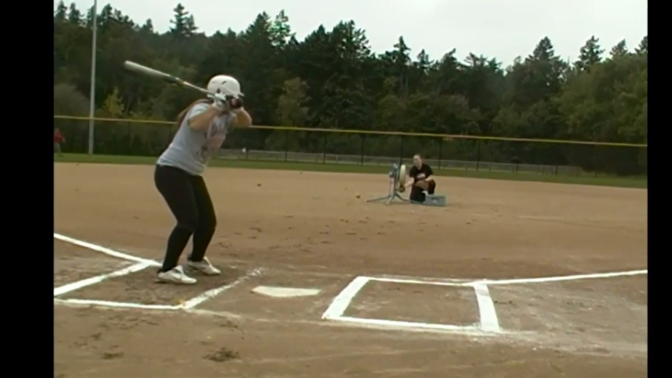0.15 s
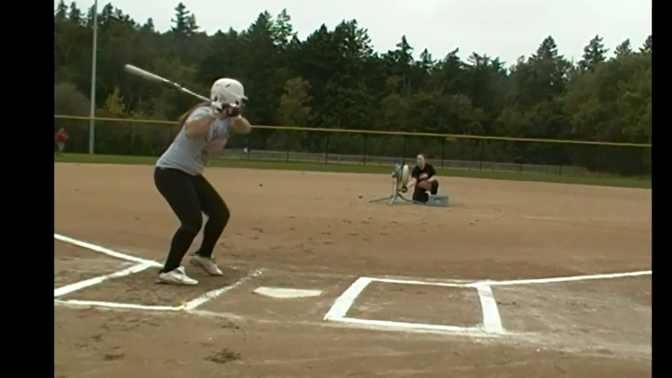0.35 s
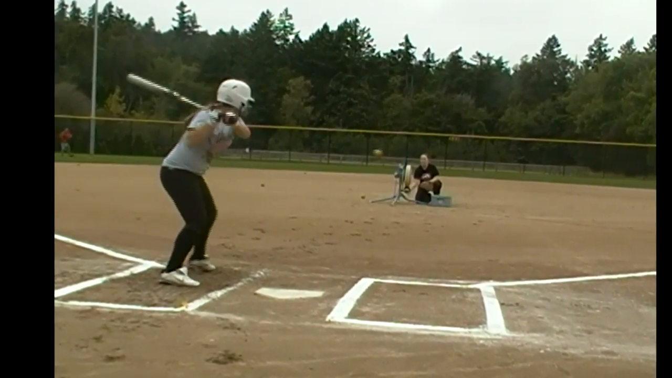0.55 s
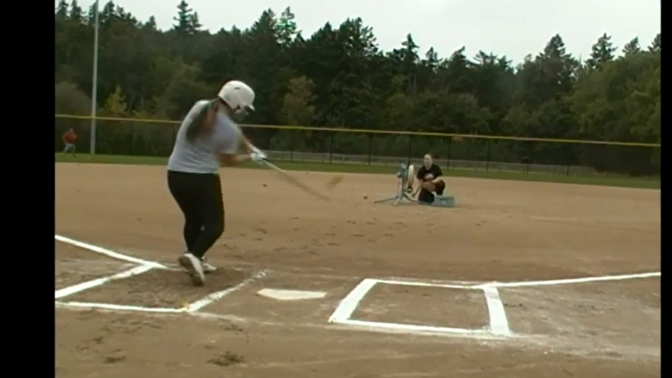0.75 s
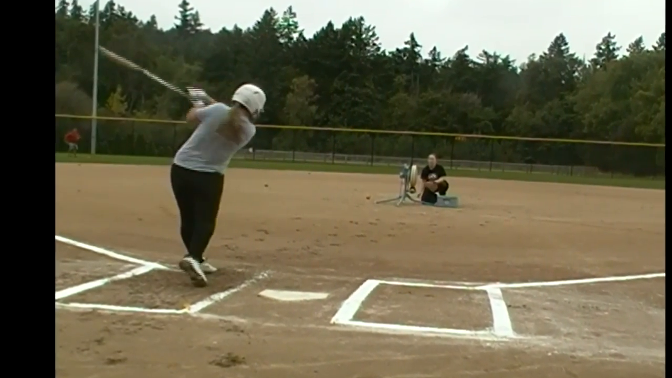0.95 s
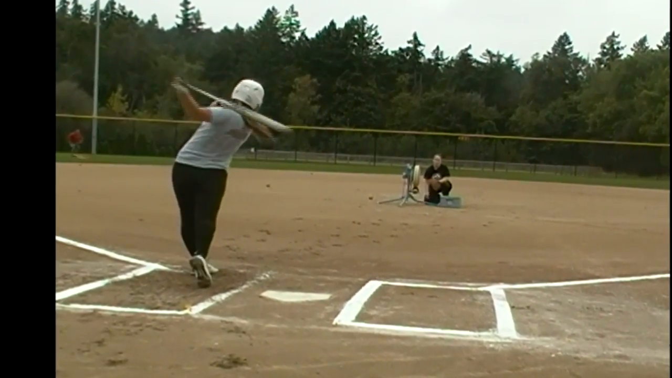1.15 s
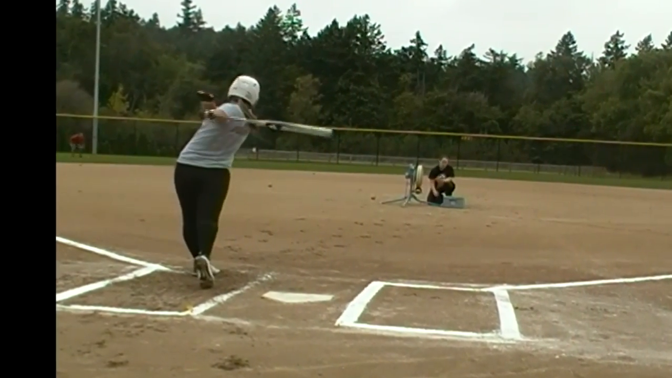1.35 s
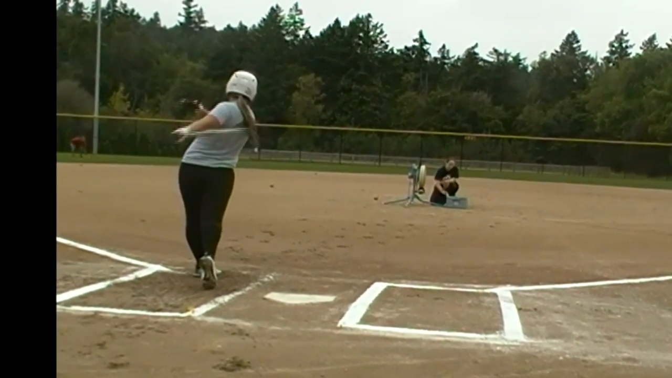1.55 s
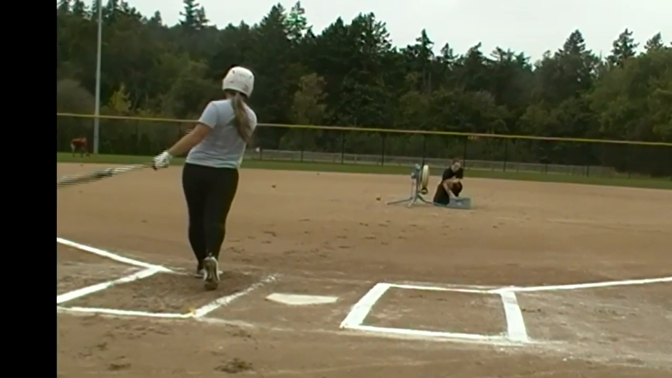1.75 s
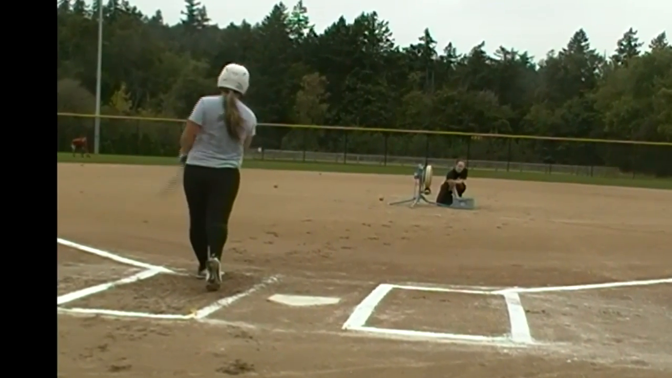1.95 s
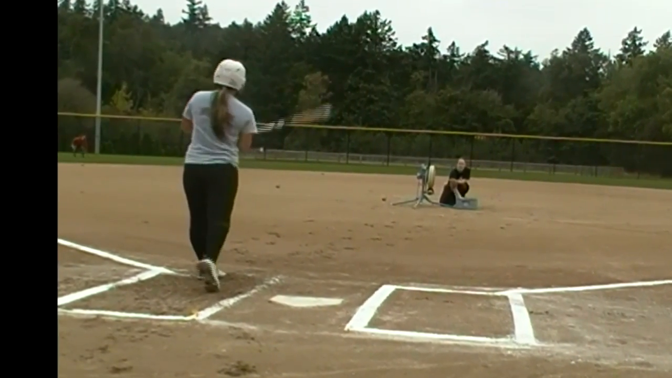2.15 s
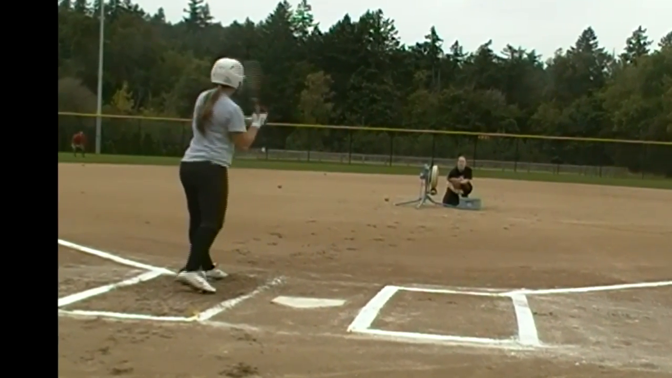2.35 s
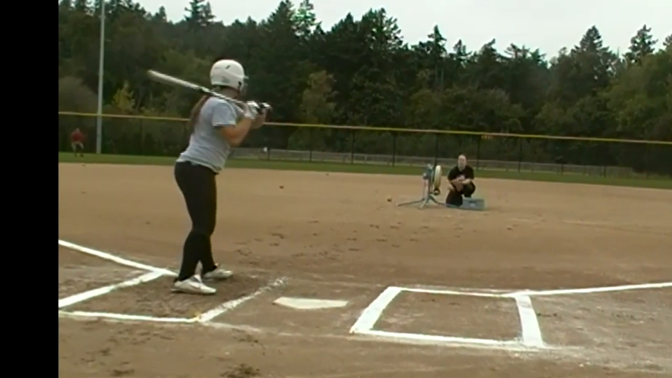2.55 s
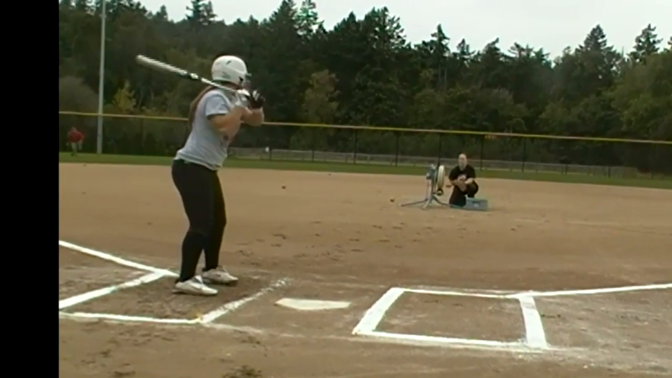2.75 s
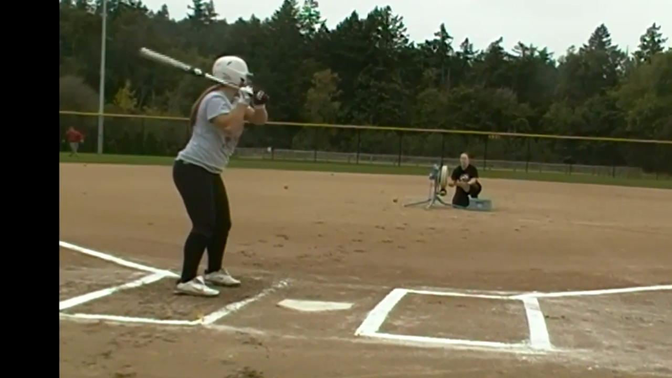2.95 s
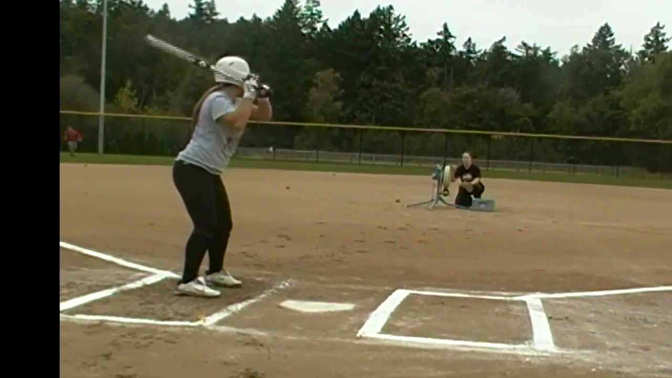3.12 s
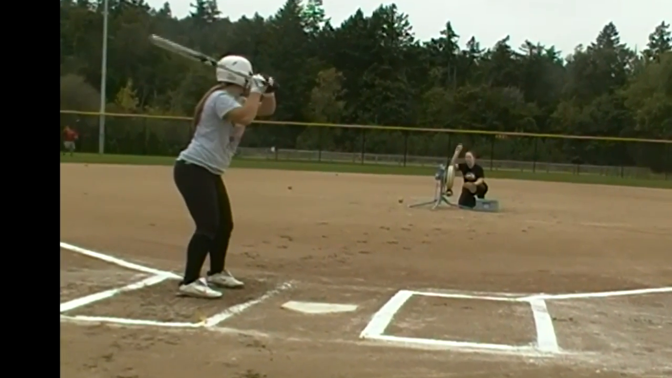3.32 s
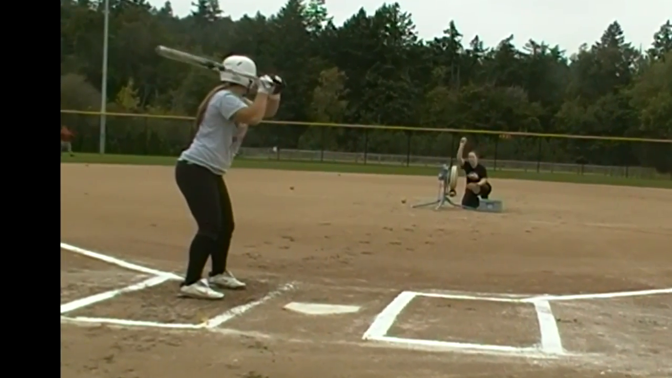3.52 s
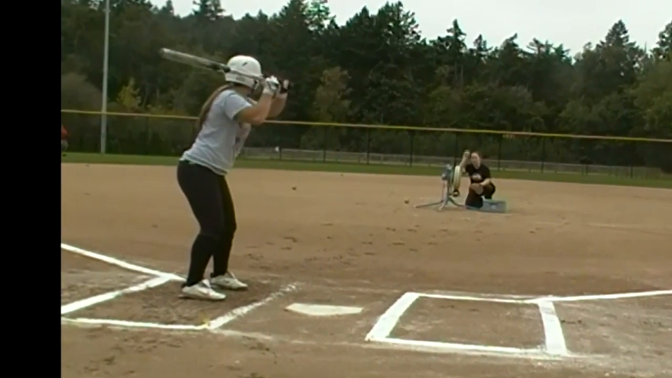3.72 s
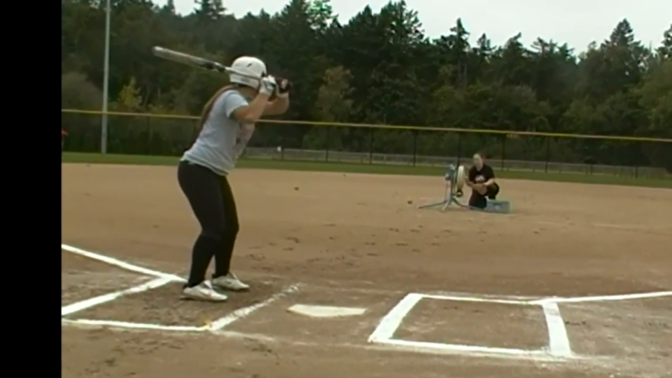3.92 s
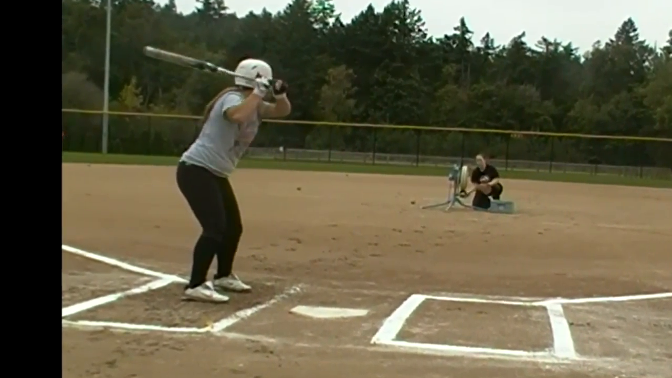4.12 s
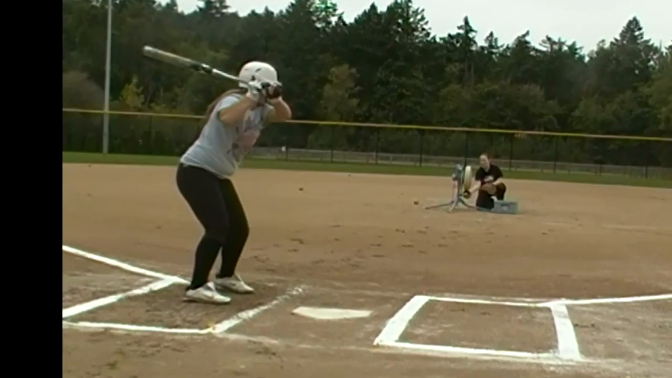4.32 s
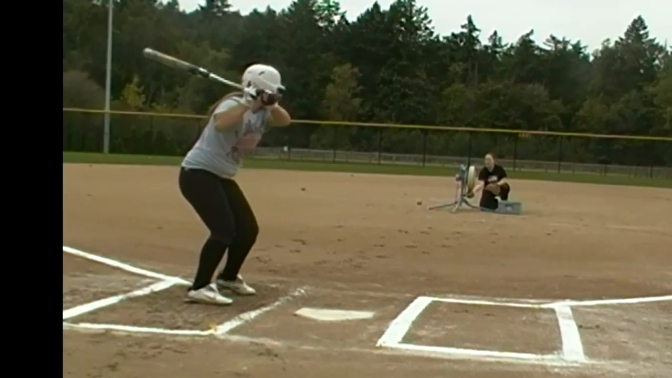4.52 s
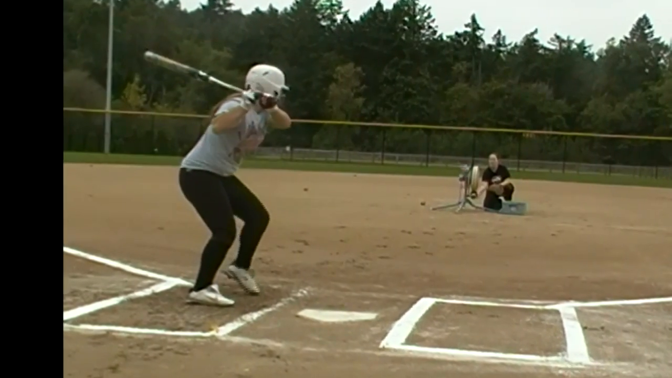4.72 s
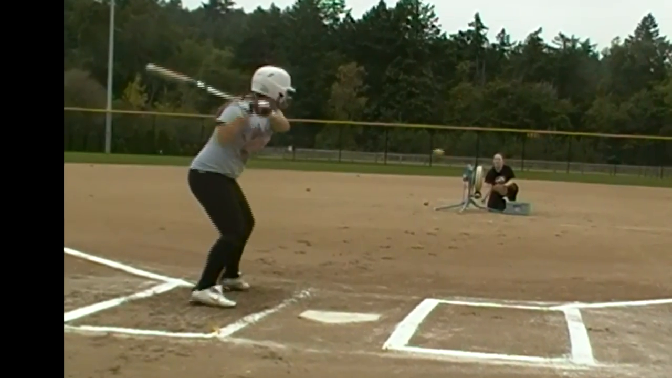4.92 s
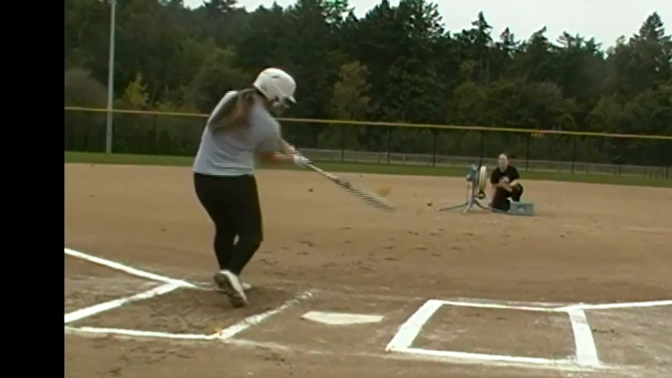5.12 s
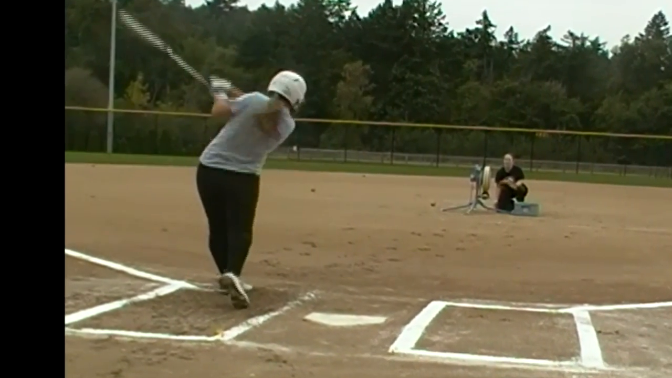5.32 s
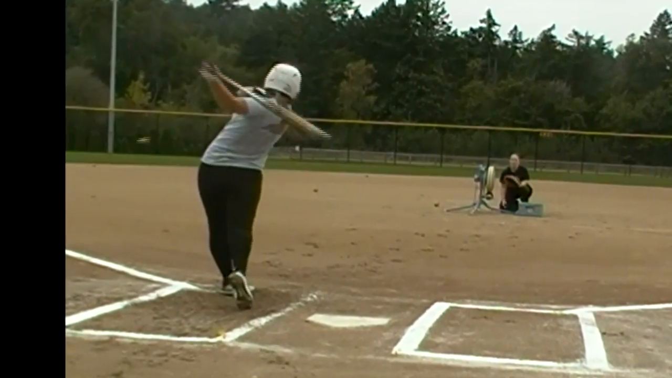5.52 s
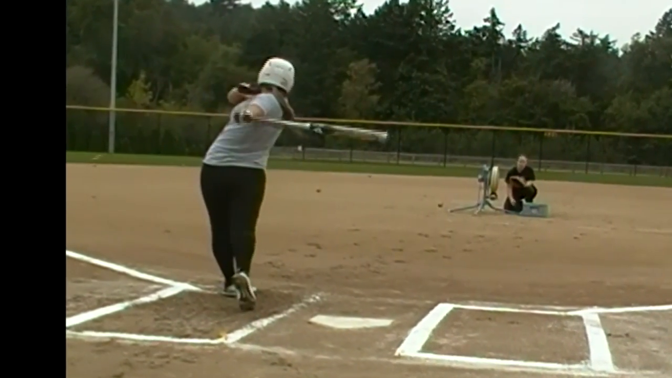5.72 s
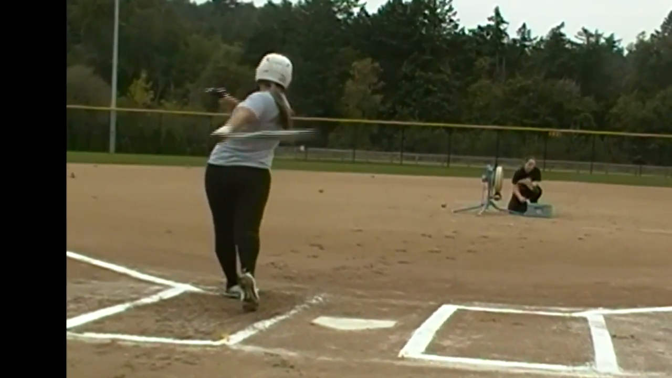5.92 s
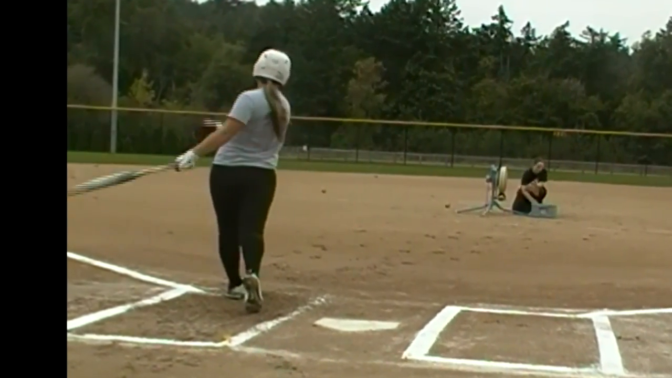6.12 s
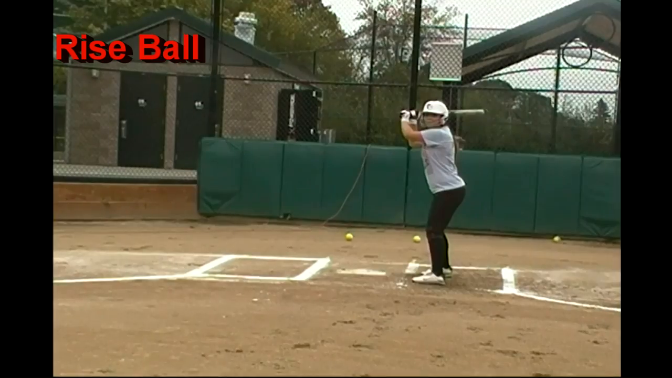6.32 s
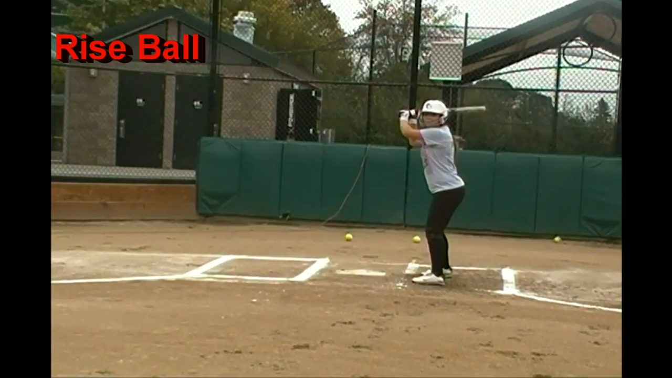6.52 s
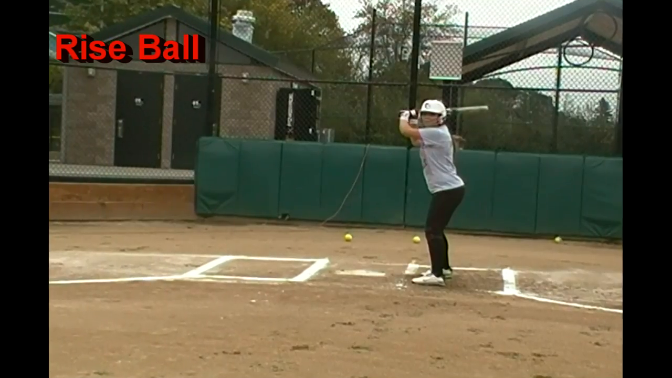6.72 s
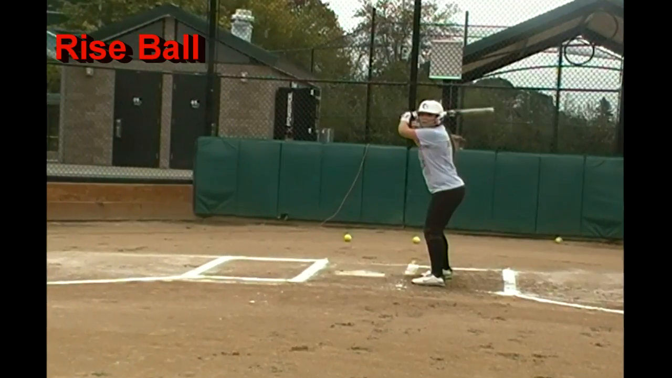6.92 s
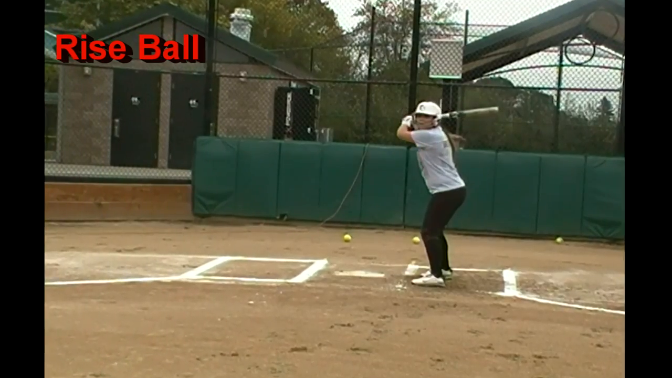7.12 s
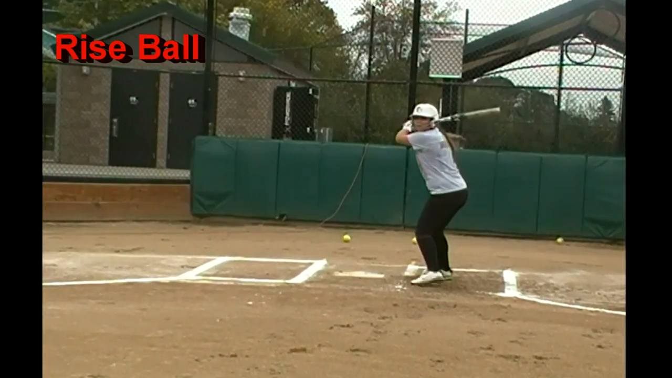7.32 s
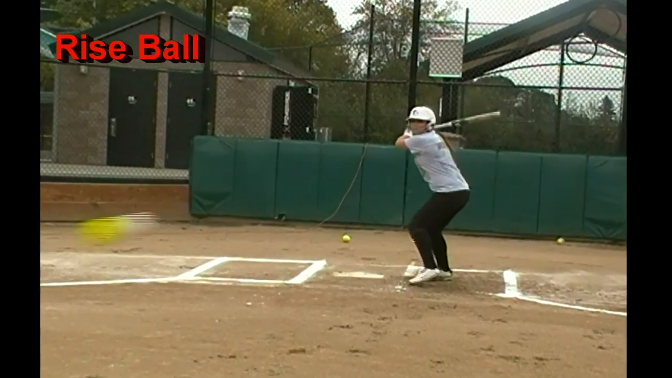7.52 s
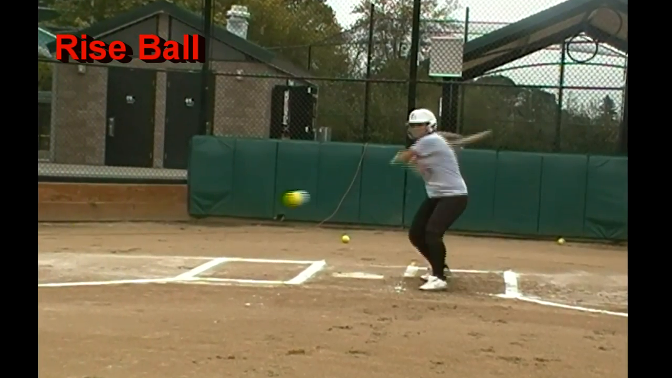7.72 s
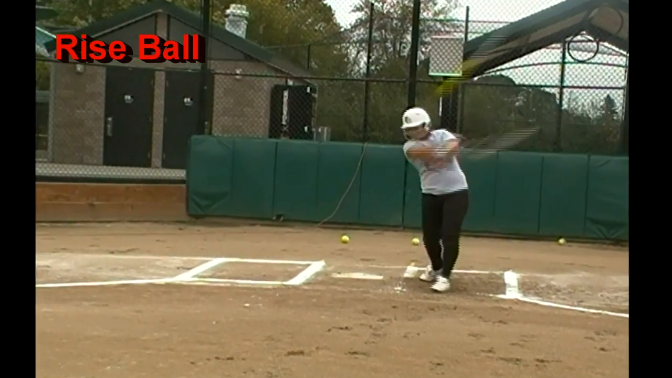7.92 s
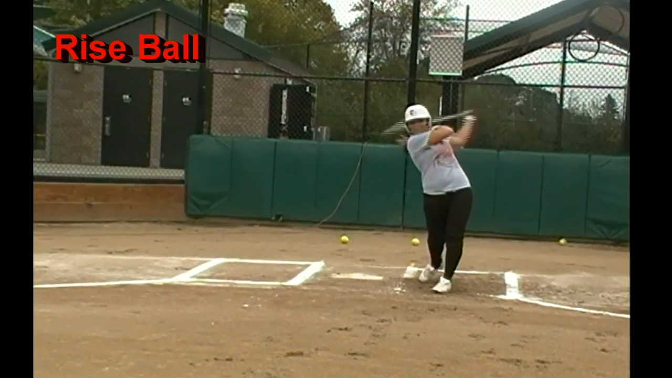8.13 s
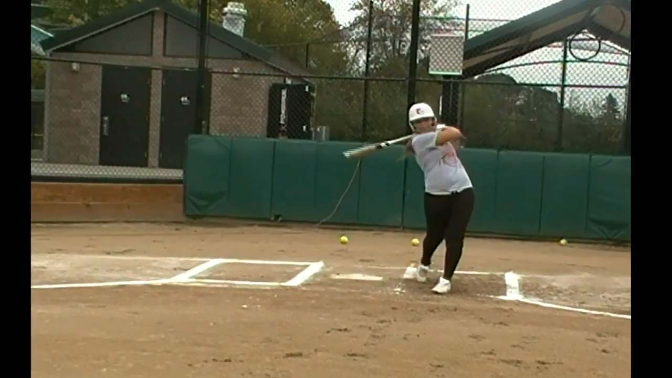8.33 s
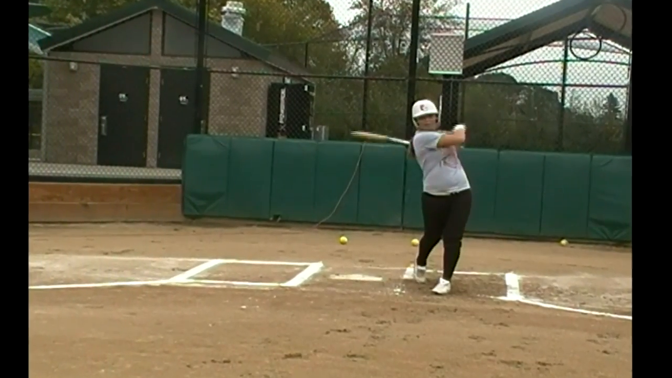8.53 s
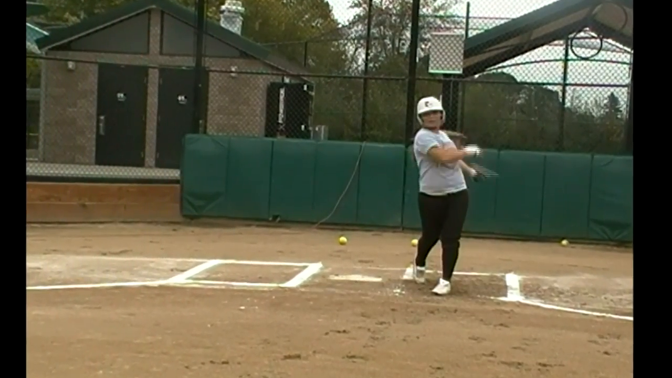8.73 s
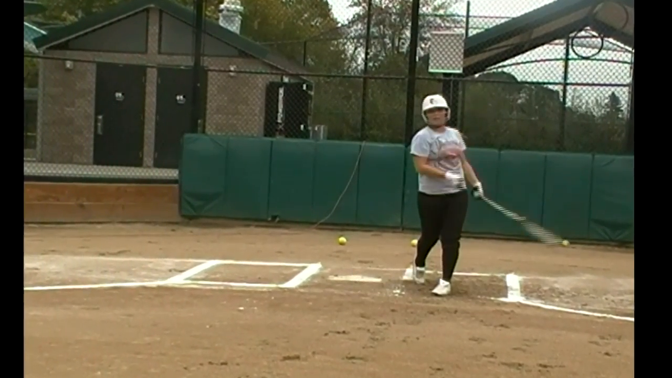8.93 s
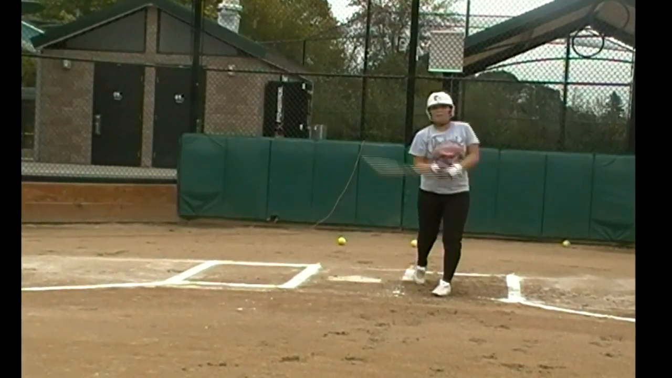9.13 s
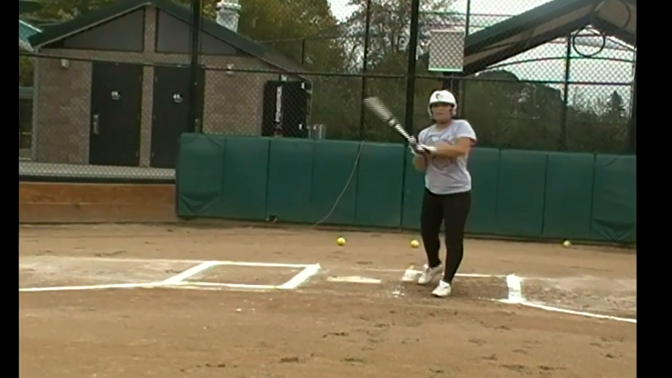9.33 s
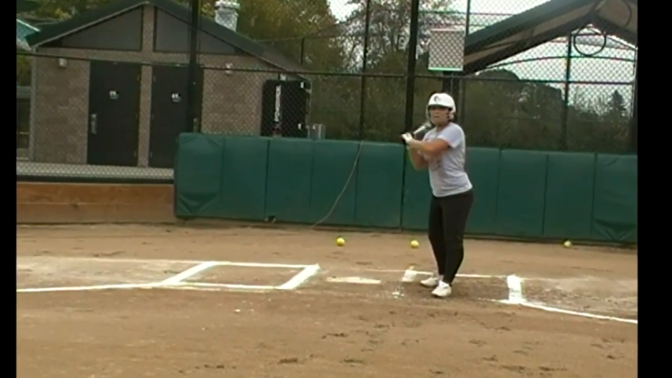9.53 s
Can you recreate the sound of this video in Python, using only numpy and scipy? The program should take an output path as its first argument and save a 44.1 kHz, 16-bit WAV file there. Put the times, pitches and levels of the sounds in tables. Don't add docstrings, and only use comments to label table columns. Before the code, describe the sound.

Outdoor softball batting practice heard from two places. First near the plate: quiet air, faint wavering machine hum, two distant thumps of thrown balls, each answered by a bright hollow bat crack that bounces back from fence and trees, with small foot scuffs between. Then an abrupt cut to close beside the pitching machine, whirring loudly; it clatters and thuds as it throws, its whine dips and returns, and the bat knocks in the distance.

```python
import sys
import numpy as np
from scipy import signal
from scipy.fft import rfft, irfft, next_fast_len
from scipy.io import wavfile
from scipy.ndimage import uniform_filter1d

SR = 44100
rng = np.random.default_rng(int(sys.argv[2]) if len(sys.argv) > 2 else 0)


def file_out(sig):
    cols = np.atleast_2d(sig).T
    lim = np.clip(cols, -1, 1)
    pcm = np.round(lim * 32767).astype(np.int16)
    wavfile.write(sys.argv[1], SR, pcm)


def volts(x):
    e = np.asarray(x, float) / 20
    return 10 ** e


N = 421596
PADDED = next_fast_len(N)
HZ = np.fft.rfftfreq(PADDED, 1 / SR) + 1

# start t/s, end t/s
CHANGE_S = (6.2715, 6.3072)
# f/Hz, level/dB per Hz
WHEEL_ROAR = [(30, -70), (60, -66.5), (180, -59.5), (500, -59), (1100, -59.5), (1500, -65.5), (2300, -65),
              (3000, -62.5), (4000, -65.5), (6000, -70.5), (7500, -69.5), (10000, -76), (12000, -89),
              (14000, -85.5)]
# t/s, level/dB
THROWS_FROM_PLATE = [
    (.460, -2.5),
    (4.810, -3.5),
]
# t/s, level/dB
THROW_BESIDE = [
    (7.5675, -2),
]
# t/s, level/dB
BATS_AT_PLATE = [
    (0.9653, -1),
    (5.3149, -0.5),
]
# t/s, level/dB
BAT_FROM_MACHINE = [
    (8.0249, -1.5),
]


def at_hz(points, hz):
    point_hz, value = np.transpose(points)
    return np.interp(np.log(hz), np.log(point_hz), value)


def rms_one(x):
    return x / np.sqrt(np.mean(x ** 2) + 1e-20)


def drift(rate):
    pole = np.exp(-80 * np.pi * rate / SR)
    noise = rng.standard_normal(N // 40 + 2002)
    slow = signal.lfilter([1], [1, -2 * pole, pole * pole], noise)[2000:]
    return np.interp(np.arange(N) / 40, np.arange(len(slow)), rms_one(slow))


def band(x, hz, octaves):
    edges = np.clip(hz * 2.0 ** (np.array([-.5, .5]) * octaves), 20, SR * .45)
    return signal.sosfilt(signal.butter(1, edges, "band", fs=SR, output="sos"), x)


def coloured(gain):
    return rms_one(irfft(rfft(rng.standard_normal(PADDED)) * gain, PADDED)[:N])


def played(events, parts, t60):
    return [(s + after, db + body_db, hz, t60, db + crack_db, crack_hz)
            for s, db in events
            for after, body_db, hz, crack_db, crack_hz in parts]


def blows(rows, crack_t60, rise_s, rough, snap=0):
    out, t = np.zeros(N + SR), np.arange(SR // 5) / SR
    noises = rng.standard_normal((len(rows), 2, len(t)))
    for (s, body_db, hz, t60, crack_db, crack_hz), noise in zip(rows, noises):
        clean = np.sin(2 * np.pi * hz * t) + 0.24 * np.sin(2 * np.pi * 1.5 * hz * t)
        shaken = rms_one(band(noise[0], 1.48 * hz, 0.27))
        body = (clean + rough * shaken) * volts(body_db - 60 * t / t60)
        burst = rms_one(band(band(noise[1], crack_hz, 0.41), crack_hz, 7.8))
        crack = 0.89 * burst * volts(crack_db - 60 * t / crack_t60)
        pull_hz = crack_hz / 3
        pull = volts(crack_db) * np.sin(2 * np.pi * pull_hz * t) * np.exp(-t * pull_hz / 0.39)
        out[round(s * SR):][:len(t)] += (body + crack) * (1 - np.exp(-t / rise_s)) - snap * pull
    return out[:N]


def echoes(x, table):
    t, response = np.arange(SR // 2 + 4096) / SR, 0
    noises = rng.standard_normal((len(table), len(t)))
    for (delay, db, hz, octaves, smear), noise in zip(table, noises):
        burst = noise * (t >= delay) * np.exp(-np.maximum(t - delay, 0) / smear * 3)
        burst = band(band(burst, hz, octaves), hz, 1.5 * octaves)
        response = response + volts(db) * burst / np.max(np.abs(rfft(burst))) * 2
    return signal.fftconvolve(x, response)[:N]


def motor_turn(lines, turns_per_s):
    size = 4096
    hz = np.arange(size // 2 + 1) * turns_per_s + 1
    comb_db = at_hz(WHEEL_ROAR, hz) + 13 + 1.2 * np.log2(hz / 3000)
    level = volts(comb_db + 4.2 * rng.standard_normal(len(hz))) * (hz < SR / 3)
    for line_hz, db in lines:
        level[round(line_hz / turns_per_s)] = volts(db)
    return irfft(level * np.exp(2j * np.pi * rng.random(len(hz))), size) * size / np.sqrt(2)


def machine_near():
    # f/Hz, level/dB rms
    free_orders = [(355.3, -38.5), (532.9, -35.5), (812.9, -36), (1028, -39), (1981, -45), (2121, -40),
                   (2159, -43), (2406, -38), (2439, -55), (2934, -39), (2972, -33.5), (3009, -34),
                   (3359, -42), (3607, -39), (3677, -39.5), (3924, -46), (3962, -39.5), (6934, -43),
                   (7144, -48), (7887, -42.5), (7924, -41), (7957, -50), (8064, -56), (8419, -57),
                   (8597, -64), (8629, -43.5), (9798, -44), (9868, -54)]
    # f/Hz, level/dB rms
    loaded_orders = [(457.6, -40.5), (479.1, -37.5), (527.6, -37.5), (667.5, -40.5), (732.1, -36.5),
                     (807.5, -36), (839.8, -52), (947.5, -42), (1050, -37), (1610, -43.5), (1960, -43.5),
                     (2417, -39), (2487, -39), (2519, -39), (2735, -104), (2945, -29), (2977, -37),
                     (3047, -71), (3327, -39.5), (3607, -41.5), (3924, -40), (6864, -43.5), (7467, -46),
                     (7709, -61), (7854, -58), (8613, -70), (9803, -46), (10794, -50)]
    grip_s, slip_db, slip_s = 7.57, 22, 0.13
    t = np.arange(N) / SR
    running_free, since_grip = t < grip_s, t - grip_s
    turns_per_s = np.where(running_free, 35.371, 34.89 + 0.1 * since_grip)
    turns = np.cumsum(turns_per_s * (1 + 0.0002765 * drift(3.12))) / SR % 1
    free, loaded = motor_turn(free_orders, 35.38), motor_turn(loaded_orders, 35.04)
    place = np.arange(len(free)) / len(free)
    whine = np.where(running_free, np.interp(turns, place, free, period=1),
                     np.interp(turns, place, loaded, period=1))
    lost_db = slip_db * ~running_free * np.exp(-(since_grip / slip_s) ** 2)
    return volts(-4.5 + drift(7.2) - lost_db) * whine


def machine_far():
    t = np.arange(N) / SR
    hum_hz = 361 - 0.242 * t
    level_db = -31 - 2.5 * t + 2.65 * drift(17.0)
    return np.sqrt(2) * volts(level_db) * np.sin(2 * np.pi * np.cumsum(hum_hz) / SR)


def throws():
    # t/s, level/dB
    feeds = [
        (.422, -13),
        (4.745, -20.5),
        (4.773, -18),
    ]
    # lag/s, body level/dB, body f/Hz, crack level/dB, crack f/Hz
    feed = [(0.0033, -1.5, 280, -7.5, 1100)]
    throw_afar = [(-.021, -10.5, 345, -23, 4500), (-.0075, -7, 349, -19.5, 9100),
                  (-.003, -19, 660, -10, 4000), (0, 2, 393, -11.5, 4440), (.0005, -7, 717, -18.5, 9800),
                  (.0125, -8.5, 634, -12, 7500)]
    frame_afar = [(.003, -3.5, 185, -38, 900), (0.0236, -13.5, 212.5, -40, 900)]
    throw_close = [(-.0355, -7, 800, -16, 2950), (-.0315, -2.5, 2150, -1, 2240),
                   (-.0185, -12, 1600, -7, 3500), (-.0165, 1.5, 2530, 8.5, 2300), (-.0095, 8, 324, 7, 1490),
                   (0, 7, 500, 4, 4800)]
    frame_close = [(.0045, 11, 212, 9.5, 895)]
    frame_hum = [(.03, -15, 199, -40, 900)]
    afar = played(feeds, feed, 0.054) + played(THROWS_FROM_PLATE, throw_afar, 0.054)
    afar += played(THROWS_FROM_PLATE, frame_afar, 0.18)
    close = played(THROW_BESIDE, throw_close, 0.061) + played(THROW_BESIDE, frame_close, 0.12)
    close += played(THROW_BESIDE, frame_hum, 0.41)
    return blows(close, 0.029, 0.0018, 0.57) + blows(afar, 0.028, 0.0014, 0.35)


def bats_near():
    # t/s, level/dB
    barrel_rings = [
        (.9652, -7),
        (5.3142, 3.5),
    ]
    # t/s, level/dB
    returns = [
        (.9652, -0.5),
        (5.3142, 2.5),
    ]
    # lag/s, body level/dB, body f/Hz, crack level/dB, crack f/Hz
    bat_close = [(0, -29, 500, -0.5, 3900), (.001, 3, 464, -0.5, 9000), (.002, -0.5, 710, -7, 6600),
                 (.008, -29, 1200, -5, 9000)]
    barrel = [(0, 1.6, 3106, -1.5, 3330), (.0025, 1.5, 1320, -14, 3300)]
    backstop = [(0.0103, 2.9, 620, -2, 2730), (.0148, 2.1, 755, -5, 7600)]
    carrying_crack = [(0.00036, 1, 510, 2.8, 2800)]
    # delay/s, level/dB, f/Hz, width/octaves, smear/s
    reflectors = [(0.062, -7, 4000, 3, 0.004), (0.123, -16, 2900, 0.55, 0.0046),
                  (.393, -14.5, 2600, 1.2, 0.0071), (.396, -21.5, 540, 0.52, 0.0098),
                  (0.409, -24, 680, 0.54, 0.029), (0.444, -19, 720, 0.9, 0.035),
                  (0.483, -14.5, 3570, 0.25, 0.0017), (0.471, -20, 3470, .4, .03)]
    contact = played(BATS_AT_PLATE, bat_close, 0.044) + played(barrel_rings, barrel, 0.017)
    direct = blows(contact, 0.014, 0.00026, 0.51, snap=1.0)
    thrown_back = blows(played(BATS_AT_PLATE, backstop, 0.037), 0.043, 0.00027, 0.95, snap=0.75)
    carried = blows(played(returns, carrying_crack, 0.017), 0.0073, 0.000047, 0.98)
    return direct + thrown_back + echoes(carried, reflectors)


def bat_far():
    # lag/s, body level/dB, body f/Hz, crack level/dB, crack f/Hz
    bat_afar = [(0, 20, 353, 9.3, 4950), (.001, 3.4, 1110, 4.5, 2490), (.0042, 16, 400, 2.3, 1480)]
    walls = [(.0424, 10, 330, 2, 3420), (.0427, 14.5, 563, -3, 800), (0.0465, 11.5, 457, 4.5, 9100),
             (.0522, 16, 420, 8.5, 3600), (.0532, 2, 546, 8, 2000), (.082, 4, 432, -16, 1000),
             (.096, -1, 466, -21, 1000), (.131, -10, 429, -16, 900), (.175, -12, 350, -21, 800)]
    rows = played(BAT_FROM_MACHINE, bat_afar, 0.013) + played(BAT_FROM_MACHINE, walls, 0.023)
    return blows(rows, 0.0096, 0.00037, 0.37, snap=0.88)


def swings():
    t = np.arange(N) / SR
    rush = sum((t < s) * volts(db - 30 - 20 * (s - t) / 0.082) for s, db in BATS_AT_PLATE + BAT_FROM_MACHINE)
    return rush * rms_one(band(rng.standard_normal(N), 800, 1.4))


def feet():
    # t/s, level/dB, f/Hz, t60/s, scratch level/dB
    scuffs = [(.566, -31, 2950, .03, -25), (.642, -15.5, 1060, .03, -31), (.643, -21, 1460, .03, -35),
              (.655, -26, 930, 0.066, -40), (1.0855, 0, 440, 0.016, -26), (1.828, -16, 335, .04, -27),
              (2.454, -20, 473, .027, -28), (2.527, -20, 181, .1, -50), (2.543, -23, 193, .026, -50),
              (2.635, -32, 720, 0.075, -40), (2.663, -24, 443, 0.042, -30), (2.697, -19, 870, .011, -33),
              (4.918, -25.5, 3050, .03, -22), (4.936, -25, 704, 0.044, -27), (6.091, -7.5, 340, 0.013, -25),
              (6.106, -18, 205, 0.044, -30), (6.786, -20, 200, 0.051, -25)]
    grit_hz = 1600
    rows = [(s, db, hz, t60, grit_db, grit_hz) for s, db, hz, t60, grit_db in scuffs]
    return blows(rows, 0.014, 0.00055, 0.42, snap=1.2)


def scatter():
    # level/dB, f/Hz, width/octaves, stretch in time
    throw_wash = [(-33.5, 380, 2.1, 0.68), (-26.5, 560, 0.92, 0.28)]
    bat_wash = [(-26, 600, 1.6, 0.75), (-31.5, 2600, 1.1, 0.73), (-34, 5550, 0.81, 0.63)]
    close_wash = [(-30, 210, 1.4, 0.86), (-18, 420, 1.6, 0.17)]
    afar_wash = [(-23.5, 360, 2.2, 0.97)]
    swell_s, hold_s, swell_db = 0.048, 0.14, 30
    early_db_per_s, late_db_per_s = 109, 44
    out, t = np.zeros(N + SR), np.arange(SR) / SR
    kinds = [(THROWS_FROM_PLATE, throw_wash), (BATS_AT_PLATE, bat_wash),
             (THROW_BESIDE, close_wash), (BAT_FROM_MACHINE, afar_wash)]
    rows = [(s, db + wash_db, *rest)
            for events, wash in kinds
            for s, db in events
            for wash_db, *rest in wash]
    for (s, db, hz, octaves, stretch), noise in zip(rows, rng.standard_normal((len(rows), SR))):
        age = t / stretch
        dying = np.maximum(age - swell_s - hold_s, 0)
        decay = volts(-early_db_per_s * dying) + volts(-21.5 - late_db_per_s * dying)
        swell = volts(db - swell_db * np.maximum(1 - age / swell_s, 0))
        colour = rms_one(band(band(noise, hz, octaves), hz, 1.2 * octaves))
        out[round(s * SR):][:SR] += colour * decay * swell
    return out[:N]


def steady():
    # f/Hz, level/dB per Hz
    field_noise = [(30, -71), (60, -65.5), (120, -57.5), (200, -60), (450, -67.5), (800, -69.5),
                   (1400, -81), (2300, -82), (3300, -81), (5000, -83), (7200, -84), (10000, -86),
                   (12000, -105), (14000, -101)]
    # f/Hz, width/Hz, level/dB over the field noise
    far_whine = [(754, 12, 9), (915, 15, 4), (1922, 12, 6), (2224, 12, 8), (2278, 15, 6), (2730, 40, 5),
                 (3015, 15, 5), (3165, 70, 6), (3400, 600, 4), (3520, 40, 4), (3640, 80, 5), (4550, 90, 4),
                 (4800, 70, 3), (5505, 25, 8), (7140, 40, 5), (7270, 70, 9), (7880, 50, 8), (8225, 40, 8)]
    # t/s, level/dB
    gust = [(0.0, 0), (1.28, 5), (2.2, 2), (3.35, 1), (4.05, 5), (4.53, 1), (5.2, 8), (5.74, 9), (6.3, 3)]
    t = np.arange(N) / SR
    gust_s, gust_db = np.transpose(gust)
    swell_db = np.interp(t, gust_s, gust_db)
    air_db = -37 + 0.17 * swell_db - 0.32 * t
    whine_db = -46 + 0.56 * swell_db - 0.48 * t
    field_gain = volts(at_hz(field_noise, HZ))
    air = coloured(field_gain)
    field = volts(air_db + drift(6.1) / 2) * (air + (volts(swell_db) - 1) * band(air, 1480, 1.0))
    field += volts(-65.5) * rms_one(band(rng.standard_normal(N), 12500, 1.0))
    peaks = sum(volts(db) / (1 + (2 * (HZ - hz) / width) ** 2) for hz, width, db in far_whine)
    throb = 1 + 0.16 * np.sin(2 * np.pi * 35.4 * t + 1.4 * drift(1.88))
    field += throb * volts(whine_db + drift(2.7) / 2) * coloured(peaks * field_gain)
    roar = volts(-27.5 + 0.48 * drift(22)) * coloured(volts(at_hz(WHEEL_ROAR, HZ)))
    return np.where(t < CHANGE_S[0], field, roar)


def two_ports(direct, diffuse, lag, top_width):
    # f/Hz, correlation
    coherence = [(40, -.1), (80, .55), (150, .86), (300, .95), (600, .96), (1400, .86), (3000, .85),
                 (6000, .6)]
    same = rfft(direct, PADDED)
    unlike = np.sqrt(np.clip(1 - at_hz(coherence, HZ), 0, 2) / 2) * rfft(diffuse, PADDED)
    turn = np.exp(-1j * np.pi * HZ * lag / SR)
    pair = np.array([(same + unlike) * turn * volts(0.62), (same - unlike) / turn * volts(0.17)])
    narrowed = same + top_width * (pair - same)
    return irfft(np.where(HZ > 6860, narrowed, pair), PADDED)[:, :N]


def scene():
    port_lag = (2.22, 3.25)
    t = np.arange(N) / SR
    hits = bats_near() + throws() + bat_far() + feet()
    ground = echoes(hits, [(0, 0.012, 4500, 6.1, 0.0015)])
    machine = np.where(t < CHANGE_S[0], machine_far(), machine_near())
    wash = machine + swings() + scatter() + steady()
    unlike = scatter() + steady()
    first, second = (two_ports(wash, unlike, lag, 0) + two_ports(hits, ground, lag, 0.34)
                     for lag in port_lag)
    fade = np.clip(np.maximum(CHANGE_S[0] - t, t - CHANGE_S[1]) / 0.0066, .001, 1)
    return np.where(t < np.mean(CHANGE_S), first, second) * fade


def band_limit(x):
    return signal.sosfilt(signal.butter(12, 15400, fs=SR, output="sos"), x)


def record(dry):
    level_db = 20 * np.log10(uniform_filter1d(np.abs(dry).max(axis=0), size=128) + 1e-6)
    excess_db = np.maximum(level_db + 15.5, 1e-3)
    ramp = np.arange(N) / SR / 0.066
    held_db = np.exp(np.maximum.accumulate(np.log(excess_db) + ramp) - ramp)
    grip = np.exp(-1 / (0.0095 * SR))
    gain = volts(signal.lfilter([1 - grip], [1, -grip], -.85 * held_db))
    overloaded = np.clip(dry * gain, -1.05, 1.05)
    bass_cut = signal.sosfilt(signal.butter(2, 70, "high", fs=SR, output="sos"), overloaded)
    return band_limit(np.clip(bass_cut, -.99, .99))


dry = scene()
out = record(dry)
file_out(out)
```